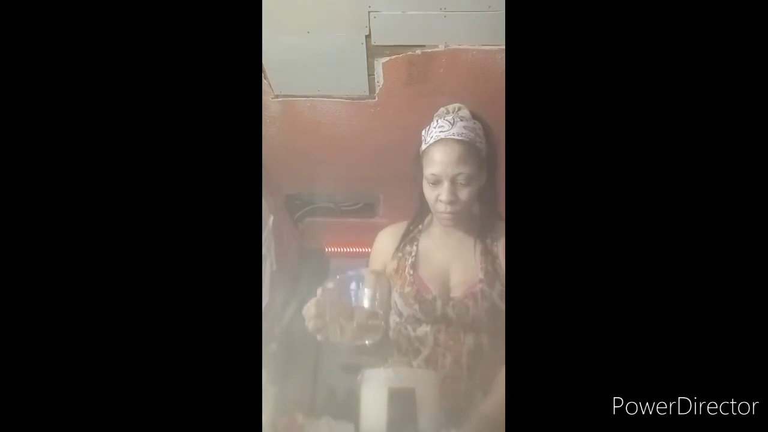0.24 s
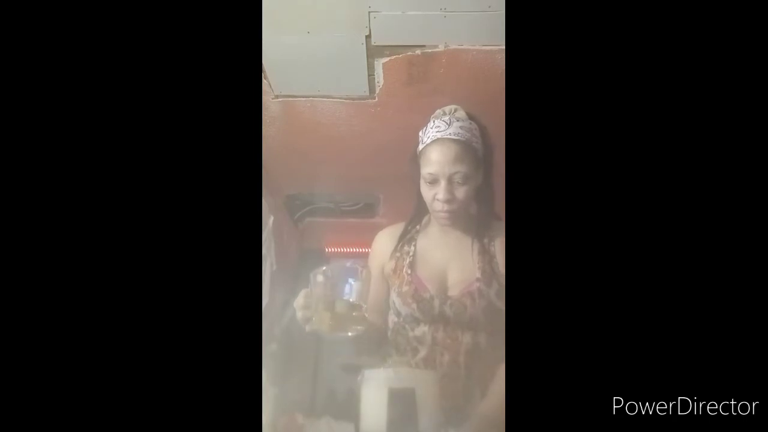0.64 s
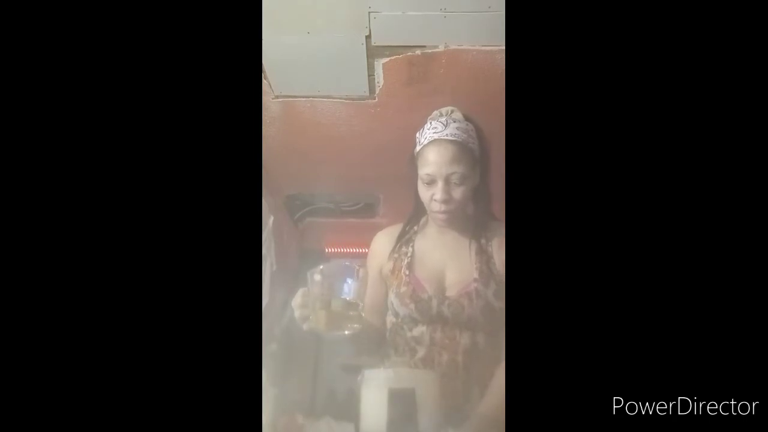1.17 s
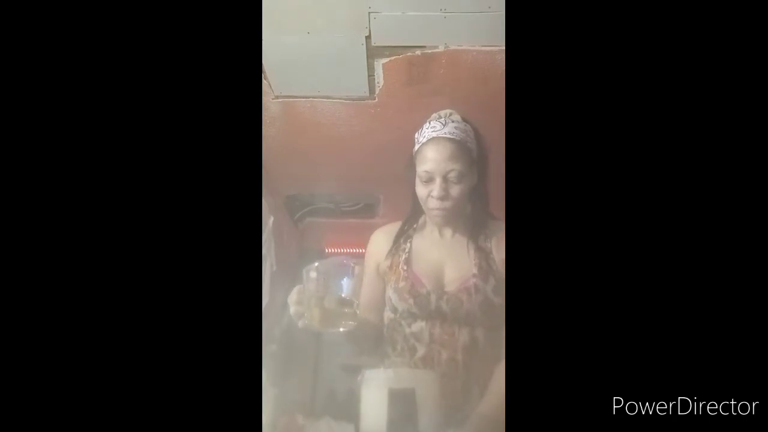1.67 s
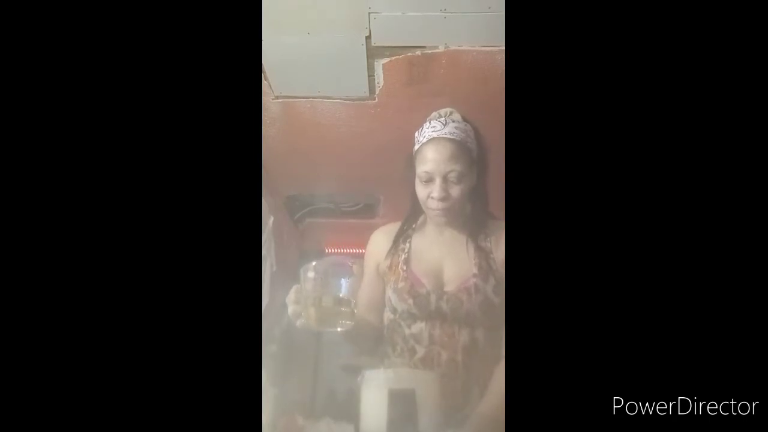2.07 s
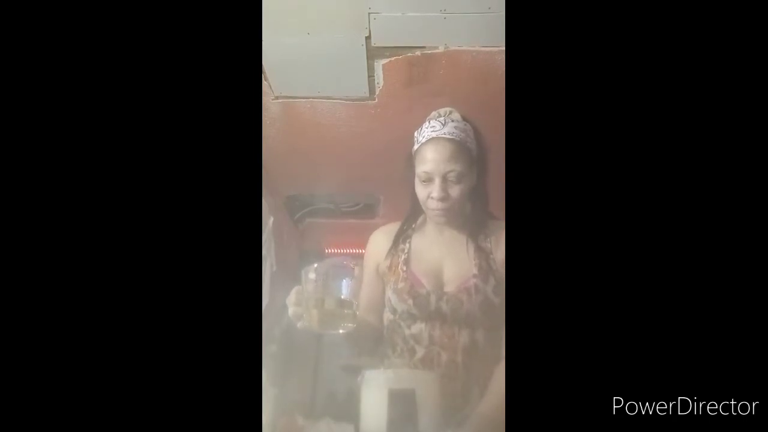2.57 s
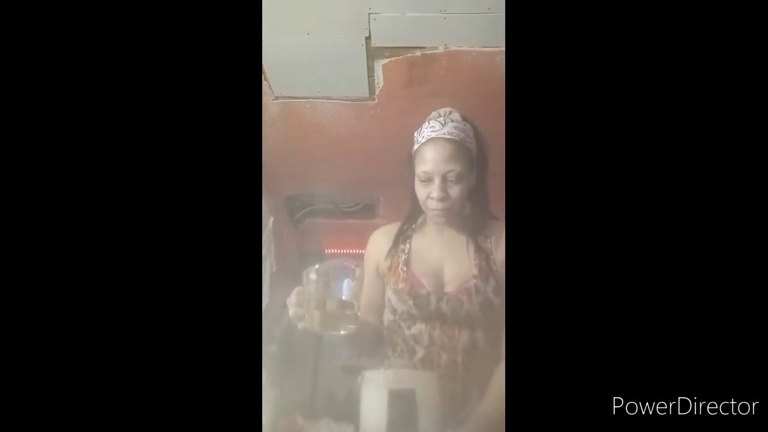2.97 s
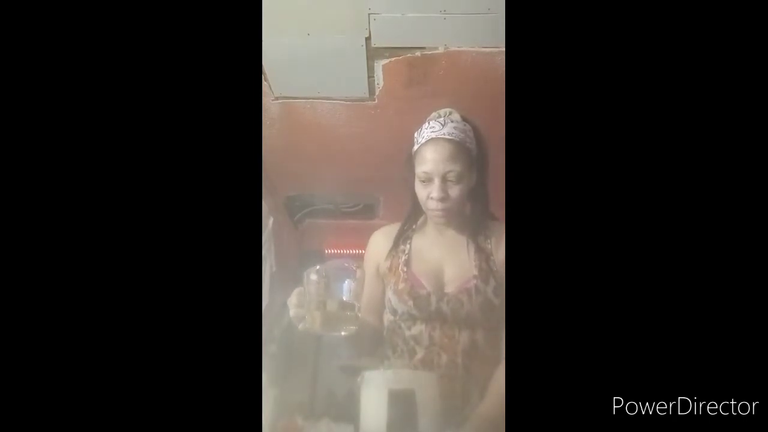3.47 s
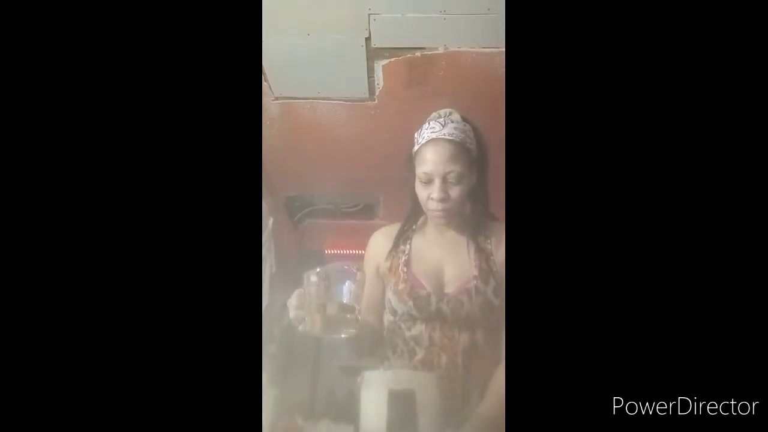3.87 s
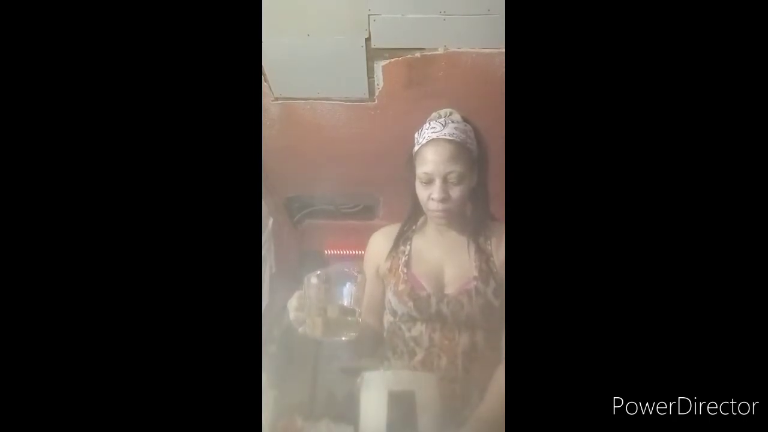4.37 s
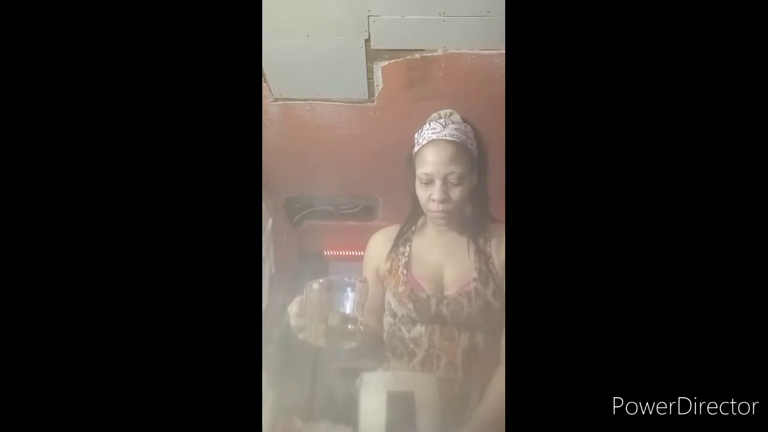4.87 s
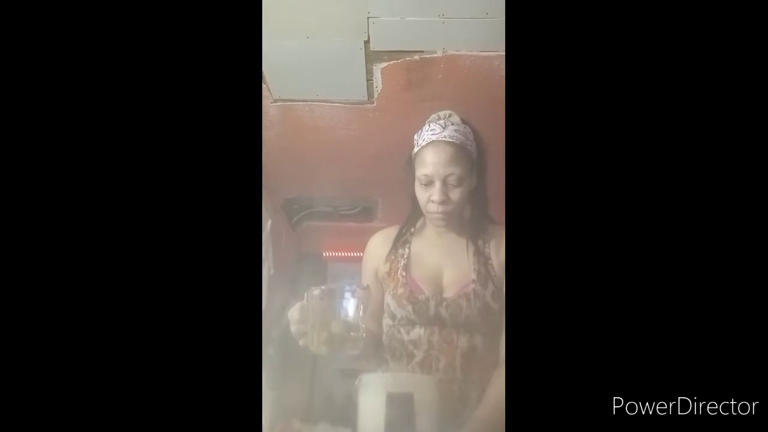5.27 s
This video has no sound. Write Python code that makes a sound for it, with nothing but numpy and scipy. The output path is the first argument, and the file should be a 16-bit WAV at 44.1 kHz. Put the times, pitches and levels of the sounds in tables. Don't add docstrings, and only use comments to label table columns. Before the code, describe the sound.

Continuous electric food processor blending thick paste, recorded close by a phone in a small kitchen. Harsh mid-high motor whine, fast tooth clatter and a broad raspy hiss dominate; low hum and worktop rumble are faint. Small surges from lumps barely ripple the level. No start, stop or separate pouring sound.

```python
import sys
import numpy as np
from scipy import signal
from scipy.fft import rfft, irfft, next_fast_len
from scipy.io import wavfile
from scipy.ndimage import map_coordinates

SR = 44100
rng = np.random.default_rng(int(sys.argv[2]) if len(sys.argv) > 2 else 0)


def attenuation_scalar(level_db):
    decades = np.asarray(level_db, float) / 20
    return 10 ** decades


def to_wav(sig):
    pcm = np.clip(np.atleast_2d(sig), -1, 1) * 32767
    pcm = np.round(pcm).astype(np.int16)
    wavfile.write(sys.argv[1], SR, pcm.T)


N = 244314

# time_s, pitch_hz
SPEED = [(0.0, 1931), (0.48, 1940), (0.75, 1927), (1.2, 1912), (2.1, 1907), (2.3, 1900), (2.6, 1901),
         (3.14, 1895), (3.65, 1894.5), (3.9, 1902), (4.37, 1926), (4.79, 1922), (4.94, 1929), (5.09, 1925),
         (5.26, 1930), (5.54, 1925)]
# time_s, level_db
CHURN = [
    (0.0, -15),
    (2.13, -14.5),
    (4.63, -14.5),
    (5.43, -15),
    (5.54, -14),
]
GEAR_ORDERS = [27, 33, 36, 37.93, 38.14, 39, 40.28, 41, 41.58, 42, 43.86, 44.11, 46.16, 47.15, 78, 80, 81,
               85.15]
# level_db, partner_one_mains_step_below_db, partner_above_db
GEAR_LEVELS = [(-51, -57, -66), (-40.5, -47, -52), (-47, -60, -60), (-40, -60, -60), (-32, -42, -50),
               (-30.5, -36, -50), (-29.5, -50, -50), (-19.6, -31, -31), (-33, -50, -50), (-34, -50, -50),
               (-37, -55, -55), (-40, -55, -55), (-44, -60, -60), (-44, -60, -60), (-38, -37, -50),
               (-35, -36, -50), (-31.5, -28, -26.5), (-40, -55, -55)]
SHAFT_ORDERS = [3, 3.52, 4.08, 6.93, 7.15, 8, 9, 11.31, 14.38, 17.46]
SHAFT_LEVELS = [-52.5, -57, -52, -49.5, -39, -79, -52.5, -58.5, -74, -55.5]
HUM = [-61, -46.5, -59, -42, -51]
# centre_hz, width_hz, level_db
BODY = [(345, 140, -23.4), (595, 170, -26), (882, 280, -31.7), (1290, 250, -24.5), (1500, 150, -20.5),
        (1651, 80, -18.2), (1780, 110, -12.9), (1904, 150, -5.4), (2128, 270, -14.4), (2510, 450, -17.1),
        (2900, 400, -13.1), (3072, 90, -10.9), (3390, 320, -11.4), (3760, 330, -7.0), (4010, 150, -13.0),
        (4520, 1410, -22.6), (5410, 60, -22.7), (5650, 500, -14.2), (6130, 200, -24.3), (6520, 110, -17.0),
        (6790, 1200, -16.9), (7210, 540, -12.7), (7590, 380, -17.7), (8510, 260, -30.4),
        (9320, 1170, -26.6), (10530, 590, -37.1), (11370, 750, -31.9), (13110, 1790, -24.3),
        (15090, 950, -33.3)]
# freq_hz, density_db_per_hz
RUMBLE = [(15, -106), (32, -94), (52, -77), (94, -76), (140, -72), (190, -70), (230, -78), (300, -86),
          (400, -120)]
# multiple of blade speed, depth_db
BEATS = [(.857, .8), (1, 1.4), (2, 1.4), (2.857, 1), (3, .9)]
# centre_hz, width_hz, repeating_share (0-1)
TOOTHED = [(1880, 280, .72), (3780, 330, .62), (5650, 200, .15)]
# time_s, depth_db
LUMPS = [
    (1.62, 0.9),
    (2.02, .8),
    (2.84, 0),
    (3.4, 0.5),
    (4.05, 0.5),
    (4.33, 0.6),
    (4.58, 0.5),
]

MESH, HUNT = 41, 7
MAINS_HZ = 60
SPLIT_HZ = 4600
SURGE_HZ, SURGES_PER_S = 2.2, 8
SWELL_DB, SWELLS_PER_S = .6, 4
LUMP_S = 0.074
ROOM_DB, ROOM_T60_S, ROOM_DELAY_S = -16, .3, .004
TOP_HZ = 15500


def unit(x):
    return x / np.sqrt(np.mean(x ** 2) + 1e-20)


def curve(rows):
    time_s, value = np.transpose(rows)
    return np.interp(np.arange(N) / SR, time_s, value)


def wobble(knots_per_s):
    coarse = np.arange(0, N + 16, 16)
    knots = rng.standard_normal(int(N * knots_per_s / SR) + 4)
    smooth = map_coordinates(knots, [coarse * knots_per_s / SR])
    return np.interp(np.arange(N), coarse, smooth)


def filtered(x, gain):
    size = next_fast_len(N + 8192)
    hz = np.fft.rfftfreq(size, 1 / SR)
    return irfft(rfft(x, size) * gain(hz), size)[:N]


def tone(cycles, db, flutter_db=1.2, wander_rad=.2):
    level = np.sqrt(2) * attenuation_scalar(db + flutter_db * wobble(7))
    phase = 2 * np.pi * (cycles + rng.random()) + wander_rad * wobble(11)
    return level * np.sin(phase)


def churn(turns, mains):
    torque_db = sum(d * np.cos(2 * np.pi * k * mains + 1.3 * k) for k, d in [(1, .7), (2, .9), (3, .5)])
    beat_db = sum(d * np.cos(2 * np.pi * (k * turns + rng.random())) for k, d in BEATS)
    chunks_db = .35 * wobble(9) + .6 * wobble(300)

    pattern = rng.standard_normal(6600)
    position = turns / HUNT % 1 * len(pattern)
    clatter = unit(map_coordinates(pattern, [position], mode="grid-wrap"))
    teeth = unit(clatter * attenuation_scalar(beat_db + torque_db))
    teeth = filtered(teeth, lambda hz: body(hz) * np.sqrt(tooth_share(hz)))

    paste = unit(rng.standard_normal(N) * attenuation_scalar(beat_db + torque_db + chunks_db))
    paste = filtered(paste, lambda hz: body(hz) * np.sqrt((1 - tooth_share(hz)) * housing_share(hz)))

    sparks_db = .8 * np.cos(2 * np.pi * 3.07 * turns) + .5 * np.cos(2 * np.pi * turns / HUNT)
    sparks_db = sparks_db + .9 * wobble(420) + .3 * wobble(7)
    fizz = unit(rng.standard_normal(N) * attenuation_scalar(torque_db + chunks_db + sparks_db))
    fizz = filtered(fizz, lambda hz: body(hz) * np.sqrt((1 - tooth_share(hz)) * (1 - housing_share(hz))))

    return attenuation_scalar(curve(CHURN) + lumps() + 0.94) * unit(teeth + paste + fizz)


def body(hz):
    return np.sqrt(sum((attenuation_scalar(db) / (1 + (2 * (hz - c) / w) ** 2)) ** 2 for c, w, db in BODY))


def tooth_share(hz):
    return np.clip(sum(s * np.exp(-((hz - c) / w) ** 2) for c, w, s in TOOTHED) + .06, 0, 1)


def housing_share(hz):
    return 1 / (1 + (hz / SPLIT_HZ) ** 12)


def lumps():
    change_db = np.zeros(N)
    for time_s, depth_db in LUMPS:
        u = (np.arange(N) / SR - time_s) / LUMP_S
        change_db += depth_db * u * np.exp(.5 - u * u / 2)
    return change_db


def gears(turns, mains):
    swell_db = SWELL_DB * wobble(SWELLS_PER_S)
    out = np.zeros(N)
    for order, (db, below_db, above_db) in zip(GEAR_ORDERS, GEAR_LEVELS):
        lift_db = swell_db if order == MESH else 0
        out += tone(order * turns, db + lift_db)
        out += tone(order * turns - mains, below_db)
        out += tone(order * turns + mains, above_db)
    return out


def motor(turns, mains):
    out = np.zeros(N)
    for order, db in zip(SHAFT_ORDERS, SHAFT_LEVELS):
        out += tone(order * turns, db, flutter_db=1.5, wander_rad=.1)
    for multiple, db in enumerate(HUM, start=2):
        out += tone(multiple * mains, db, flutter_db=-1.7, wander_rad=.1)
    return out


def kitchen(x):
    t = np.arange(SR // 4) / SR
    tail = rng.standard_normal(len(t)) * attenuation_scalar(-60 * t / ROOM_T60_S) * (t > ROOM_DELAY_S)
    wet = signal.fftconvolve(x, tail / np.linalg.norm(tail))[:N]
    return (x + attenuation_scalar(ROOM_DB) * wet) / np.hypot(1, attenuation_scalar(ROOM_DB))


def counter():
    freq_hz, density_db = np.transpose(RUMBLE)
    gain = lambda hz: attenuation_scalar(np.interp(np.log(hz + 1), np.log(freq_hz + 1), density_db))
    return np.sqrt(SR / 2) * filtered(rng.standard_normal(N), gain)


def scene():
    pitch_hz = curve(SPEED) + SURGE_HZ * wobble(SURGES_PER_S)
    turns = np.cumsum(pitch_hz) / SR / MESH
    mains = MAINS_HZ * np.arange(N) / SR
    mix = kitchen(churn(turns, mains)) + gears(turns, mains) + motor(turns, mains) + counter()
    return mix[None]


def band_limit(x):
    return signal.sosfilt(signal.butter(12, 16440, fs=SR, output="sos"), x)


def record(dry):
    x = dry[0] / (1 + np.abs(dry[0] / .98) ** 8) ** (1 / 8)
    x = filtered(x, lambda hz: hz < TOP_HZ)[None]
    return band_limit(x)


dry = scene()
out = record(dry)
to_wav(out)
```